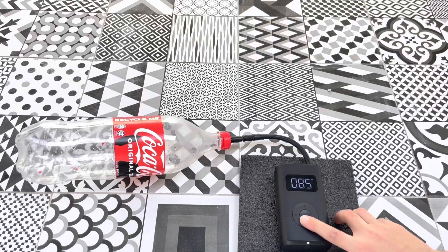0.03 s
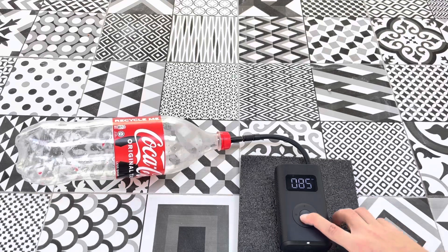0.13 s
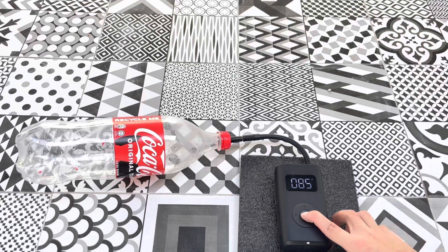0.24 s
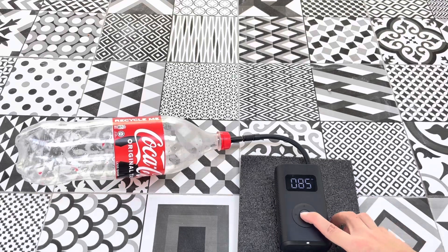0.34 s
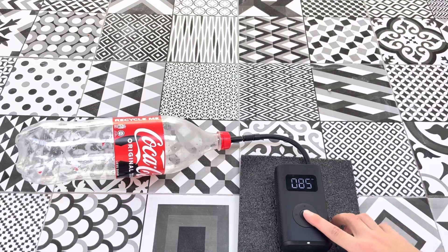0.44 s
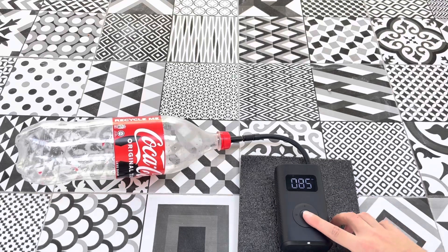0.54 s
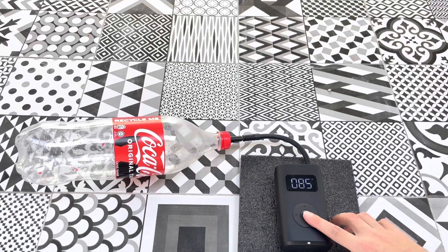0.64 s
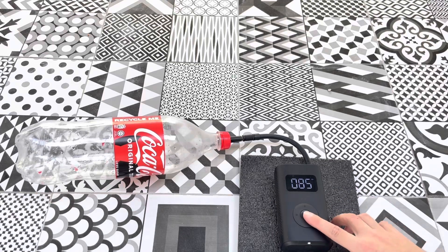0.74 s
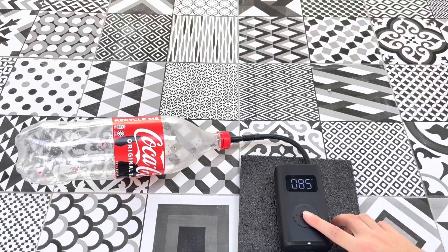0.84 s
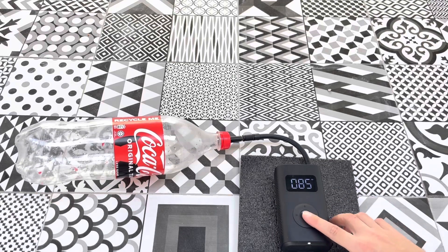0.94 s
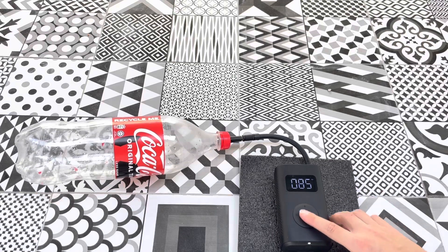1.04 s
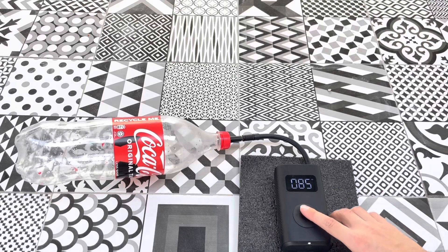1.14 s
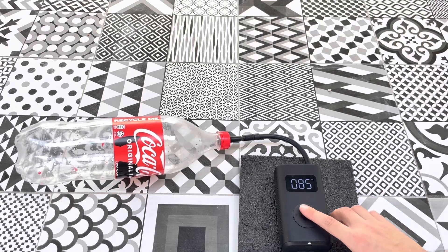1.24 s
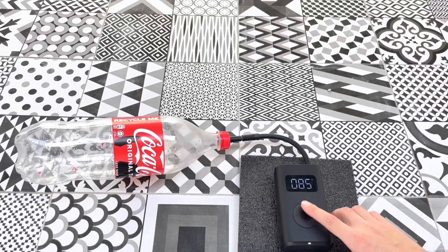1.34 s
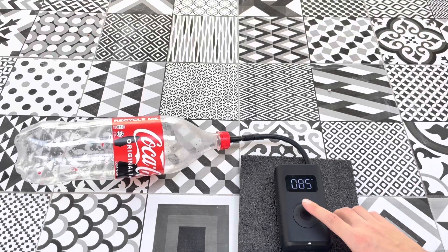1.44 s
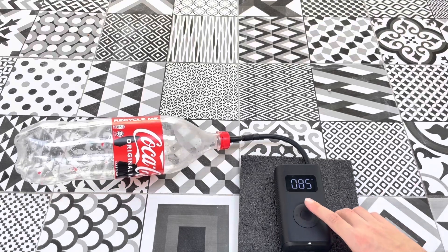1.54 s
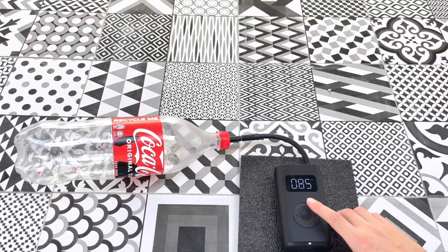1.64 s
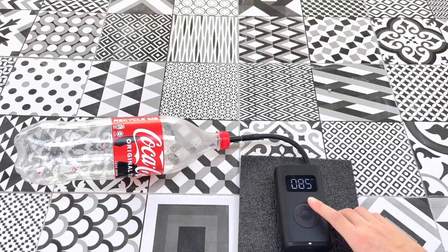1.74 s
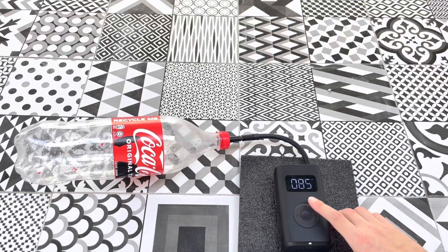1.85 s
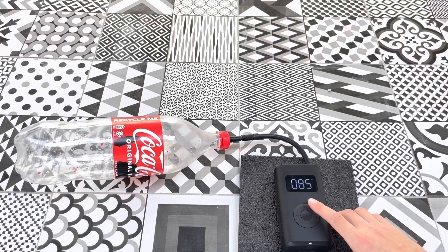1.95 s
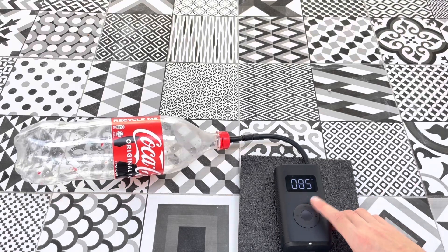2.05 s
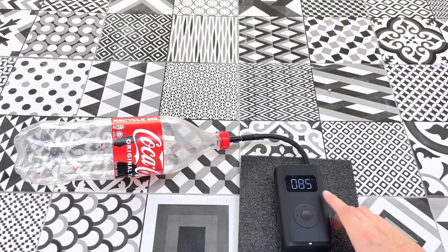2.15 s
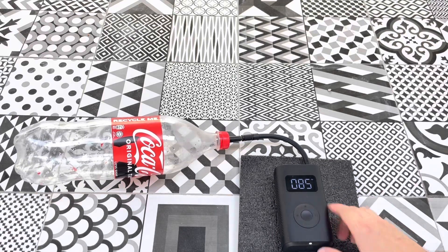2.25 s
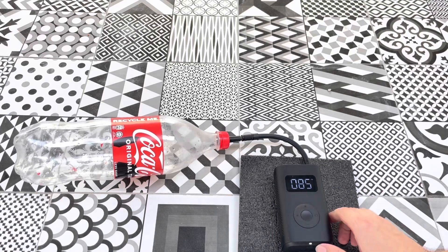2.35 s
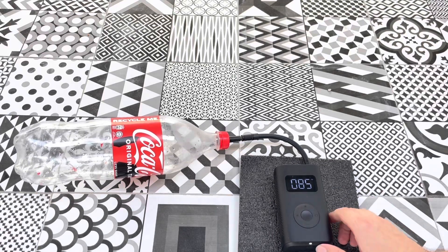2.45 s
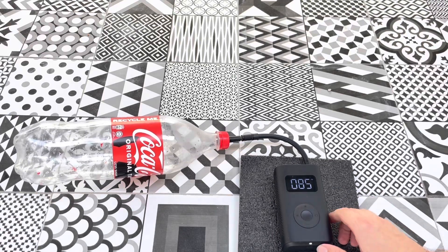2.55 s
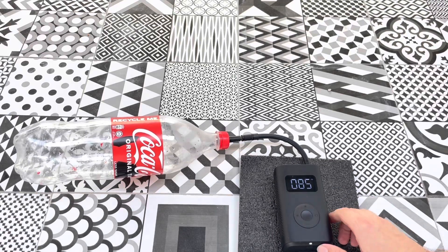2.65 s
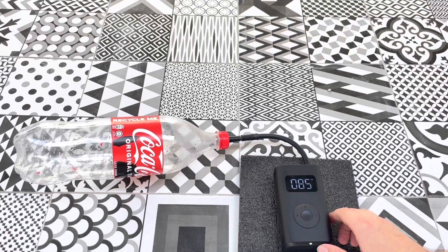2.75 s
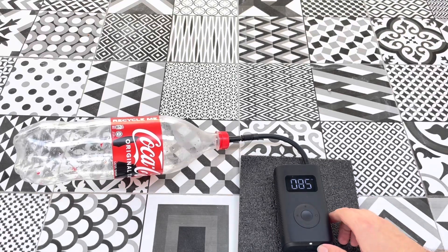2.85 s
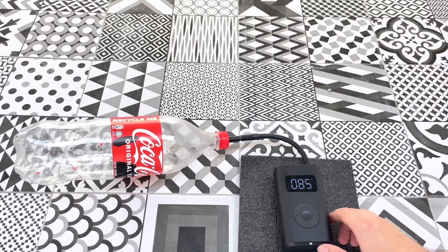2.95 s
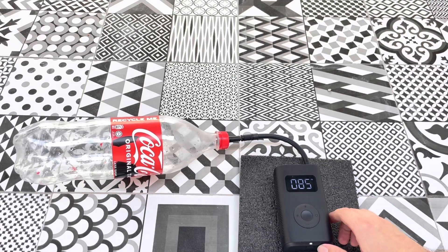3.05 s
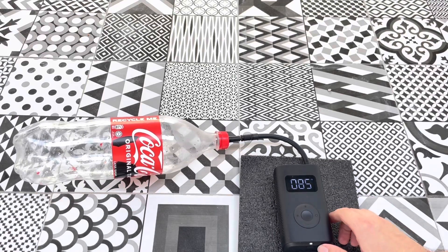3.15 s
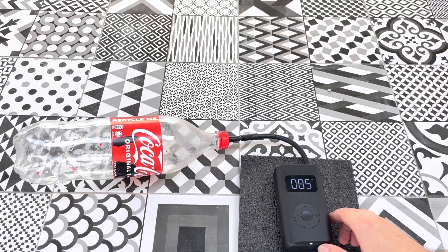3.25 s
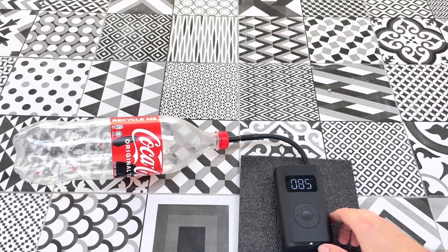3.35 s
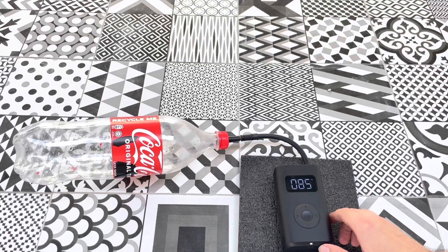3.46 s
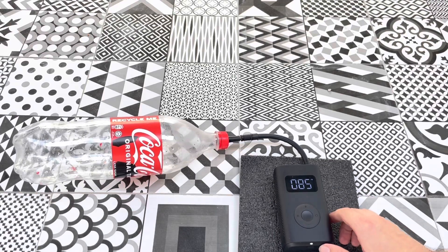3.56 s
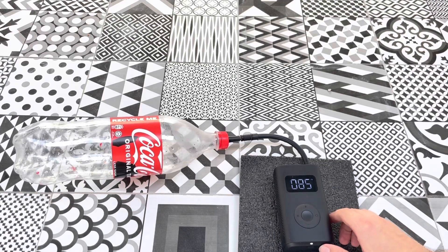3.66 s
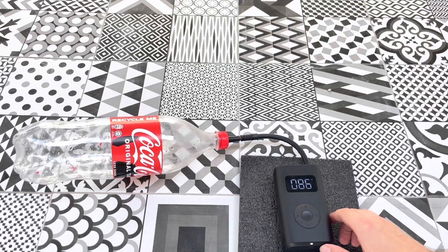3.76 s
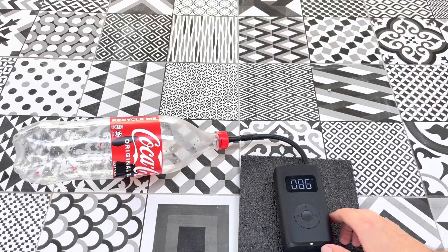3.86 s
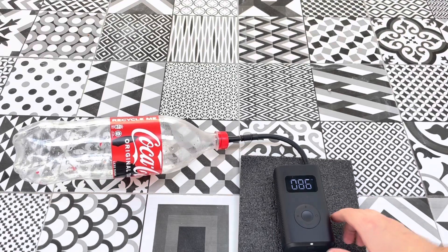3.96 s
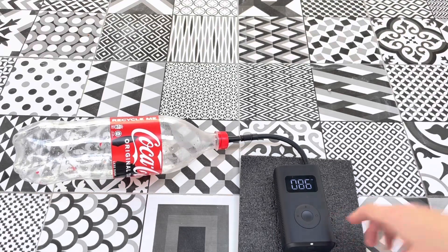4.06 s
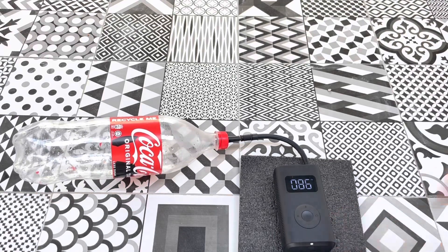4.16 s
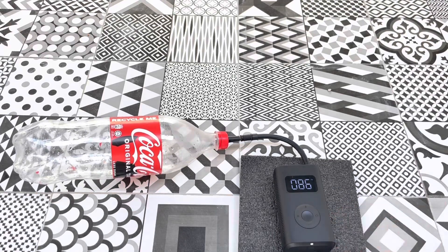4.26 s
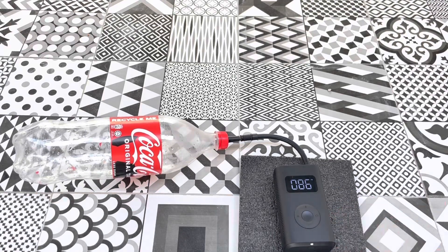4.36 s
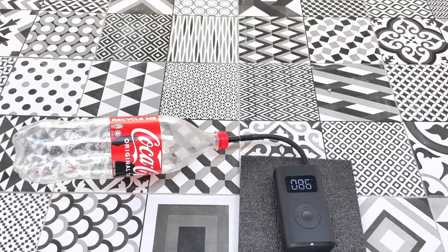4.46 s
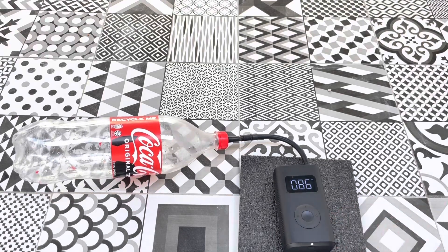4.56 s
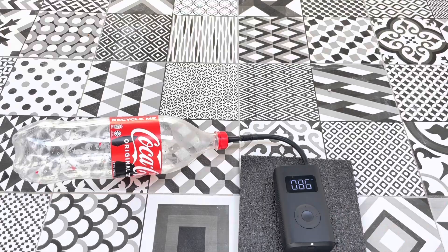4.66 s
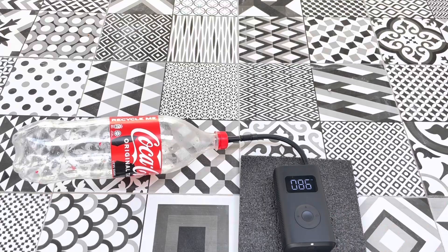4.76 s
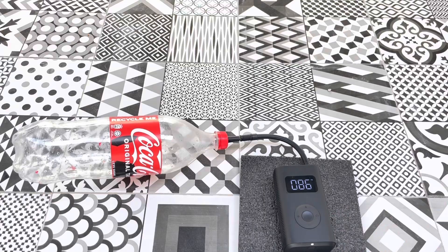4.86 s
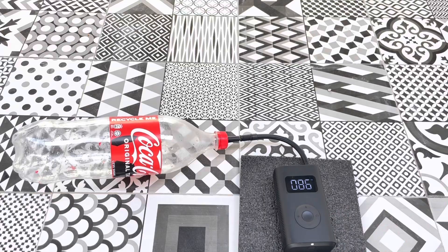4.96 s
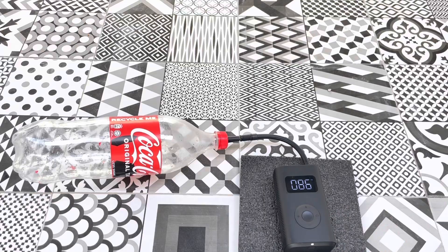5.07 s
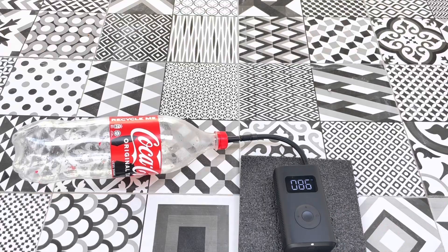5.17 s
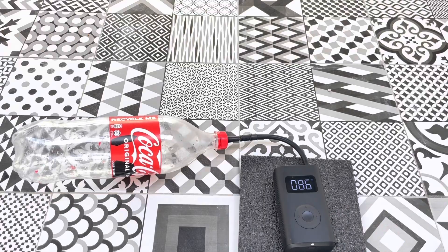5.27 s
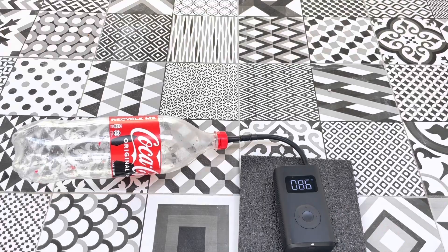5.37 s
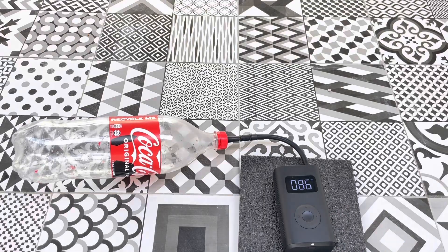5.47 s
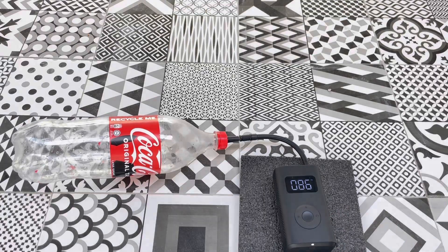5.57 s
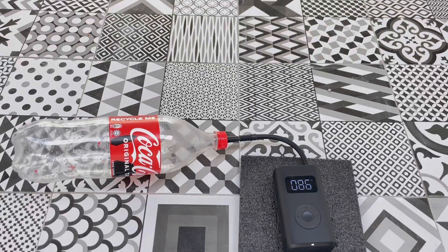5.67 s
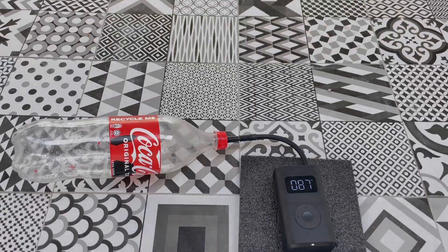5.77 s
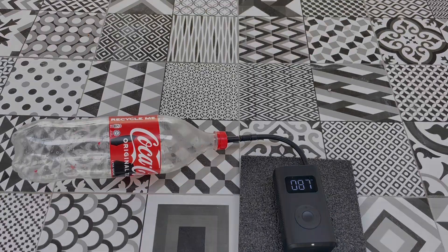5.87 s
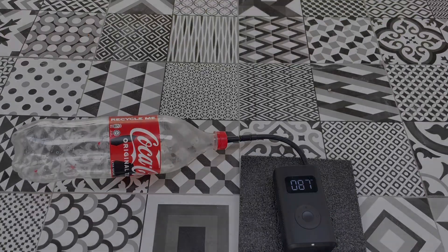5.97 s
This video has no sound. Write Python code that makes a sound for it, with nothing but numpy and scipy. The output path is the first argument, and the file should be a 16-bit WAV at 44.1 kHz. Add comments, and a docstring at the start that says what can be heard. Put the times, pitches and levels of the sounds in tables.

```python
"""A faint finger rub and a button tick, then a small piston air pump spins up on a mat and chatters
away, filling a sealed plastic bottle in a tiled room. Each crank turn brings brief valve chirps, a
rattle that swells with the load, a knock at top dead centre and a falling thump through hose and bottle.
The geared motor hums against it, and the tone shifts as pressure builds. Hiss and low rumble lie
beneath; two microphone ports give the stereo image."""
import sys
import numpy as np
from scipy import signal
from scipy.fft import rfft, irfft, next_fast_len
from scipy.io import wavfile

SR = 44100
rng = np.random.default_rng(int(sys.argv[2]) if len(sys.argv) > 2 else 0)


def put_to_file(sound):
    """Save the sound as 16-bit audio at rate SR, in the file named by the first command-line argument."""
    columns = np.atleast_2d(sound).T  # one column per channel
    safe = np.clip(columns, -1, 1)
    whole_steps = np.round(safe * 32767)
    wavfile.write(sys.argv[1], SR, whole_steps.astype(np.int16))


N = 265878
TIME = np.arange(N) / SR
FFT_SIZE = next_fast_len(N + 8192)
HZ = np.maximum(np.arange(FFT_SIZE // 2 + 1) * SR / FFT_SIZE, 1)


def from_db(db):
    """Decibels to gain."""
    return 10 ** (np.asarray(db) / 20)


def unit_rms(x):
    """Scale to rms 1."""
    return x / np.sqrt(np.mean(x ** 2) + 1e-20)


def curve(points):
    """Draw (freq_hz, value) points across the spectrum on a log-frequency axis."""
    freq_hz, values = np.transpose(points)
    return np.interp(np.log(HZ), np.log(freq_hz), values)


def eq(x, response):
    """Filter a signal by a frequency response."""
    return irfft(rfft(x, FFT_SIZE) * response, FFT_SIZE)[..., :N]


def resonance(hz, width_hz):
    """Complex response of one mode, 1 at its peak."""
    return 1 / (1 + 1j * (HZ ** 2 - hz ** 2) / (HZ * width_hz))


def drift(knots_per_s):
    """A slow random wander with a spread of about 1."""
    knots = rng.standard_normal(int(N / SR * 40) + 3)
    return 1.2 * np.interp(TIME * knots_per_s, np.arange(len(knots)), knots)


def per_turn(turns, spread):
    """One bounded random value for each crank turn, held through it."""
    return spread * np.sqrt(3) * rng.uniform(-0.84, 1, 200)[np.round(turns).astype(int)]


def from_nearest(turns):
    """Offset from the nearest whole turn, -0.5 to 0.5."""
    return (turns + .5) % 1 - .5


def gate(turns, length_ms):
    """A smooth bump around every whole turn."""
    away_ms = from_nearest(turns) * 31   # a turn lasts about 31 ms
    return np.exp(-2.8 * (away_ms / length_ms) ** 2)


def room_tone():
    """Soft hiss over a lumpy low rumble that wavers, swells now and then and slowly fades."""
    # hiss colour: freq_hz, level_db
    hiss_eq = [(100, -9), (200, -0.5), (400, -9), (900, -11), (1600, -20.5), (3500, -29.5), (7000, -35),
               (10000, -37), (13000, -46)]
    # rumble colour: freq_hz, level_db
    rumble_eq = [(20, -38), (40, 1.5), (65, 5.5), (100, -3), (140, -10.5), (200, -49)]
    # brief swells and a dip in the rumble: centre_s, lift_db, half_width_s
    swells = [(0.548, -1, .08), (1.502, 5, 0.1), (2.012, 7.5, 0.11), (2.227, 8, 0.039), (2.534, 11, 0.063),
              (3.546, 5, 0.15), (4.673, 3, 0.045)]
    swell_db = sum(db * np.exp(-((TIME - centre_s) / width_s) ** 2) for centre_s, db, width_s in swells)
    rumble_db = -44.3 - 0.15 * TIME + 1.5 * drift(8) + swell_db
    noise = rng.standard_normal((2, N)) * [[1], [1.5]]   # rows: direct, scattered
    hiss = unit_rms(eq(noise, from_db(curve(hiss_eq)) * (HZ > 90)))
    rumble = unit_rms(eq(rng.standard_normal((2, N)), from_db(curve(rumble_eq))))
    return from_db(-45.5) * hiss + from_db(rumble_db) * rumble


def tiled_room(t60_s=0.16, tail_db=-10):
    """Room response: direct sound plus a short, dense tail off the tiles."""
    tail = rng.standard_normal((2, 8000)) * from_db(-60 * np.arange(8000) / SR / t60_s)
    tail = tail / np.sqrt(np.sum(tail ** 2, axis=1, keepdims=True))
    return 1 + from_db(tail_db) * rfft(tail, FFT_SIZE)


def finger_rub(centre_s=0.077, half_width_s=0.075, level_db=-58.5):
    """A fingertip slides onto the key: a faint, bright rustle of skin on plastic."""
    swell = np.exp(-((TIME - centre_s) / half_width_s) ** 2)
    rustle = eq(rng.standard_normal((2, N)), resonance(4700, 3000) + 0.26 * resonance(9300, 2000))
    return from_db(level_db) * swell * unit_rms(rustle)


def button_tick():
    """The plastic key snaps: one click rings its short modes."""
    # key press: start_s, strength_db
    presses = [(0.1616, -7.5)]
    # modes of the key: pitch_hz, width_hz, gain_db
    modes = [(1600, 400, 3), (2300, 200, 1), (3050, 350, 0), (3450, 250, 0), (4100, 300, 5),
             (4850, 400, -4), (5500, 500, -8), (10500, 2000, -22)]
    click = np.zeros(N)
    for start_s, strength_db in presses:
        click[int(start_s * SR)] = from_db(strength_db)
    key = sum(from_db(db) * resonance(hz, width) * (-1) ** k for k, (hz, width, db) in enumerate(modes))
    return eq(click, key)


def hose_phase(hz):
    """Phase shift in radians through hose and bottle, where the lows come late."""
    # group delay: freq_hz, delay_ms
    delays = [(60, 14), (160, 10.5), (350, 7), (550, 5.6), (720, 2.6), (900, 2.2), (1500, .9), (3000, 0)]
    phase = -2 * np.pi * np.cumsum(curve(delays) / 1000) * SR / FFT_SIZE
    return np.interp(hz, HZ, phase)


def motor_hum(turns, gear_ratio=148 / 15, sag_rad=.7):
    """The unbalanced shaft beats against the tenth crank harmonic; it lags and catches up each stroke."""
    angle = 2 * np.pi * gear_ratio * turns + .94 + hose_phase(10 * 32.25)
    return from_db(-49) * np.cos(angle + sag_rad * np.sin(2 * np.pi * turns))


def bottle_thump(turns, pressure):
    """Crank harmonics line up into a falling sweep each turn; pressure steadies the wavering top ones."""
    # thump partials, relative levels: harmonic, low_pressure_db, high_pressure_db
    partials = [(2, -50, -53), (3, -58, -56), (4, -51, -55), (5, -46, -46), (6, -59, -60), (7, -50, -51),
                (8, -53, -55), (9, -49, -59), (10, -47, -48), (11, -48, -49), (12, -47, -47),
                (13, -54, -56), (14, -56, -54), (15, -50, -50), (16, -50, -47), (17, -46, -44.5),
                (18, -56, -60), (19, -59, -50), (20, -53, -64), (21, -51, -56), (22, -45, -44),
                (23, -43, -44), (24, -40.5, -40.5), (25, -42, -51), (26, -46, -46), (27, -49, -45),
                (28, -46, -41), (29, -49, -45), (30, -46, -50), (31, -50, -56), (32, -47, -50),
                (33, -52, -51), (34, -51, -46), (35, -51, -54), (36, -51, -46.5), (43, -60, -50),
                (49, -54, -46), (50, -58, -50)]
    thump = 0
    for k, low_db, high_db in partials:
        level_db = low_db + (high_db - low_db) * pressure + 2.0 + 0.08 * k + 1.5 * drift(5)
        blur = .45 * rng.standard_normal()   # echoes inside the bottle smear the sweep
        waver = (0.067 + (0.55 - 0.24 * pressure) * (k > 20)) * drift(18)
        phase = 2 * np.pi * k * turns + blur + hose_phase(k * 32.53) + waver
        thump = thump + from_db(level_db) * np.cos(phase)
    return thump


def valve_chirps(turns, pressure):
    """Each valve sings briefly once a turn, its timing, pitch, phase and strength new each time."""
    # chirps, relative levels: centre_turns, pitch_hz, scatter_hz, low_pressure_db, high_pressure_db,
    # length_ms, scatter_rad
    voices = [(-.32, 3185, 45, -38.5, -38.5, 2.5, 1.65), (-0.37, 2860, 54, -50, -45.5, 2.2, 2.2),
              (0.097, 845, 43, -40, -42, 3.7, 1.12), (-.19, 1714, 43, -39.5, -37.5, 2.1, 0.79),
              (-.09, 2400, 98, -53, -58, 1.2, 1.45), (-0.2, 8180, 70, -50, -43, 5.2, 1.6),
              (0.03, 2040, 200, -42, -39, 1.8, 1.7), (0.08, 1380, 51, -39, -48.5, 2.4, 1.35),
              (0.08, 5500, 240, -44.5, -48, 2.4, 1.9), (-0.202, 5820, 150, -49, -53, 2, 2.1)]
    chirps = 0
    for centre, pitch_hz, scatter_hz, low_db, high_db, length_ms, scatter_rad in voices:
        cycle = turns - centre
        jittered = cycle + per_turn(cycle, 0.0058)
        away_s = from_nearest(jittered) / 32.7   # about 32.7 turns a second
        tones = []
        for _ in range(2):   # direct, scattered
            hz = pitch_hz + per_turn(cycle, scatter_hz)
            tones.append(np.sin(2 * np.pi * hz * away_s + per_turn(cycle, scatter_rad)))
        level_db = low_db + (high_db - low_db) * pressure + per_turn(cycle, 1.0)
        chirps = chirps + from_db(level_db) * unit_rms(tones * gate(jittered, length_ms))
    return chirps


def load_rattle(noise, turns):
    """Uneven contacts make a gritty rattle that swells with the load on the piston."""
    # load through one stroke: position_turns, level_db
    stroke = [(-.5, -16), (-.42, -14), (-.3, -4), (-.2, -2), (-.08, -1), (-.03, -5), (.04, -2), (.1, -4),
              (.15, -11), (.3, -18), (.5, -16)]
    # rattle colour ahead of the casing: freq_hz, gain_db
    rattle_eq = [(300, -65), (800, 11), (1500, 6.5), (3000, 7), (4000, 7.5), (5000, 9), (9000, 10.5),
                 (15000, 2)]
    grit_db = 1.5 * rng.exponential(1, N // 40 + 1).clip(0, 3)
    grit = from_db(grit_db).repeat(40)[:N]   # contacts last about a millisecond
    load_db = np.interp(from_nearest(turns), *np.transpose(stroke)) + per_turn(turns, 0.5)
    return eq(unit_rms(noise * grit) * from_db(load_db), from_db(curve(rattle_eq)))


def piston_knock(noise, turns, centre_turns=.002):
    """A sharp knock at top dead centre, a little loose in timing and strength."""
    # knock colour ahead of the casing: freq_hz, gain_db
    knock_eq = [(300, -16), (800, 1), (1500, -3), (3000, 2), (5000, 10), (9000, 7.5), (15000, 4)]
    burst = gate(turns + per_turn(turns, 0.009) - centre_turns, length_ms=1.3)
    strength = from_db(4.5 + per_turn(turns, 1.8))
    return eq(noise * burst * strength, from_db(curve(knock_eq)))


def mechanism(turns, pressure):
    """Steady whirr, rattle and knock ring through the casing, whose modes rebalance with pressure."""
    # colour of gears and casing: freq_hz, gain_db
    casing_eq = [(120, -22), (400, -13), (660, -6), (760, -1.5), (950, -0.5), (1250, -2), (2100, -2),
                 (3200, -2.5), (3750, -9), (5000, -9.5), (6600, -16.5), (8000, -16.5), (9600, -16),
                 (12000, -15), (13300, -13), (15300, -29)]
    # casing modes: pitch_hz, width_hz, low_pressure_lift_db, high_pressure_lift_db
    modes = [(1203, 20, -12, -27), (1374, 146, 7.5, 4.5), (1590, 25, -14, 9), (1976, 100, 2.5, 7),
             (2202, 28, 3.5, 6.5), (2380, 150, 4.5, 3.5), (2840, 78, 5.5, 5), (3030, 37, 3, 0),
             (3240, 58, 2, 4), (3530, 150, 3.5, 4.5), (3740, 150, -3.5, -5), (3970, 97, 2, 4.5),
             (5000, 190, -1.5, 2), (5550, 61, 6, 7.5), (5920, 330, 9, 9), (6433, 145, 10, 11),
             (7200, 250, -26, -24), (10460, 450, 5.5, 7)]
    whirr, rattle_noise, knock_noise = rng.standard_normal((3, 2, N))
    drive = whirr + load_rattle(rattle_noise, turns) + piston_knock(knock_noise, turns)
    body = from_db(curve(casing_eq)) * np.exp(1j * hose_phase(HZ)) * tiled_room()
    slack = 1 + sum((from_db(db) - 1) * resonance(hz, width) for hz, width, db, _ in modes)
    strained = 1 + sum((from_db(db) - 1) * resonance(hz, width) for hz, width, _, db in modes)
    clatter = (1 - pressure) * eq(drive, body * slack) + pressure * eq(drive, body * strained)
    return from_db(-0.5) * unit_rms(clatter)


def air_pump(build_start_s=1.2, build_end_s=4.8):
    """One crank drives valves, thump, motor and mechanism, hunting slowly as pressure builds."""
    # crank speed: time_s, turns_per_s
    speed = [(.335, 24.4), (.4, 27.0), (.43, 31.4), (.52, 32.5), (.79, 32.8), (.86, 32.08), (1.2, 31.98),
             (1.33, 32.9), (2.2, 32.869), (2.58, 32.409), (2.9, 32.894), (3.3, 32.804), (3.8, 32.085),
             (4.55, 32.356), (4.75, 32.279), (5.3, 32.312), (6.03, 32.107)]
    # fader on the whole pump: time_s, gain_db
    fader = [(0.3475, -85), (0.350, -33), (0.356, -30), (0.364, -27), (0.374, -23), (0.4, -22),
             (0.5, -21.5), (1.2, -22.5), (2.5, -23), (4.2, -23.5), (6.03, -23.5)]
    turns = np.cumsum(np.interp(TIME, *np.transpose(speed), left=0)) / SR   # whole turn: top dead centre
    pressure = np.clip((TIME - build_start_s) / (build_end_s - build_start_s), 0, 1)
    spin_up = np.clip((turns - .3) / 3, 0, 1)   # the thump needs a few turns to come in
    tonal = valve_chirps(turns, pressure) + spin_up * (bottle_thump(turns, pressure) + motor_hum(turns))
    gain = from_db(np.interp(TIME, *np.transpose(fader)))
    return gain * (mechanism(turns, pressure) + from_db(24.0) * tonal)


def mic_ports(direct, scattered):
    """Direct sound reaches both ports alike, scattered sound opposed; phase and balance vary by band."""
    # phase between the ports: freq_hz, left_lead_rad
    lead = [(300, -.1), (780, -.3), (1100, 0), (1800, -.2), (2800, .4), (4200, -.2), (5500, -.1),
            (6290, -1.0), (6720, -3.14), (8000, -3.2), (9100, -4.5), (10300, -6.28), (11700, -6.3),
            (13400, -9.42)]
    # balance: freq_hz, left_over_right_db
    balance = [(60, 1), (110, -2.5), (200, 0), (360, -4), (660, -0.5), (1200, 0), (2180, 0), (3960, 3),
               (7220, -3), (13100, 1)]
    # likeness of the ports: freq_hz, likeness_0_to_1
    likeness = [(60, .72), (160, .93), (390, .87), (500, .76), (800, .66), (1300, .7), (2200, .93),
                (2700, .68), (3300, .76), (3750, .55), (4700, .8), (6000, .75), (6550, .55), (7100, .995),
                (8000, .98), (9300, .65), (10400, .995), (11600, .99), (12900, .65), (14000, .99)]
    alike = np.clip(curve(likeness), 0, 1)
    side = np.array([[1], [-1]])
    placement = np.exp(.5j * side * curve(lead)) * from_db(side * curve(balance) / 2)
    centre = eq(direct, placement * np.sqrt((1 + alike) / 2))
    width = eq(scattered, -1j * side * placement * np.sqrt((1 - alike) / 2))
    return centre + width


def scene():
    """Pump, key and room tone, as they reach the two ports."""
    direct, scattered = air_pump() + button_tick() + finger_rub() + room_tone()
    return mic_ports(direct, scattered)


def record(dry):
    """The port cavities lift the treble; a steep low-pass cuts the very top."""
    cavity_hz, width_hz, lift_db, cutoff_hz = 7700, 1100, 5, 13700
    lifted = eq(dry, 1 + (from_db(lift_db) - 1) * resonance(cavity_hz, width_hz))
    return signal.sosfilt(signal.cheby2(20, 70, cutoff_hz, fs=SR, output="sos"), lifted)


dry = scene()
out = record(dry)
put_to_file(out)
```